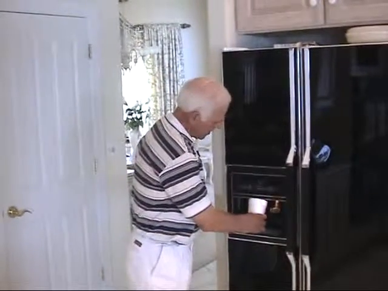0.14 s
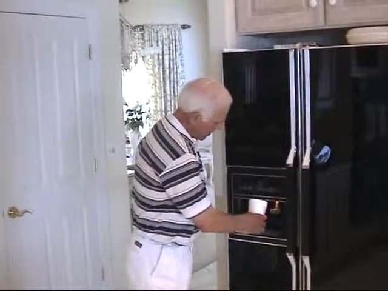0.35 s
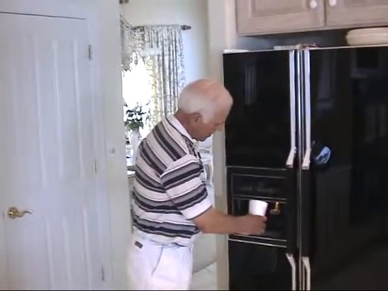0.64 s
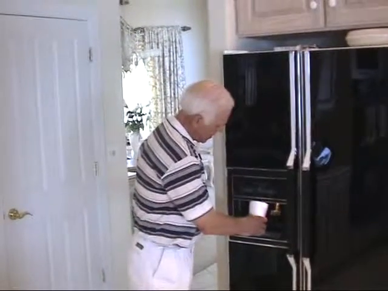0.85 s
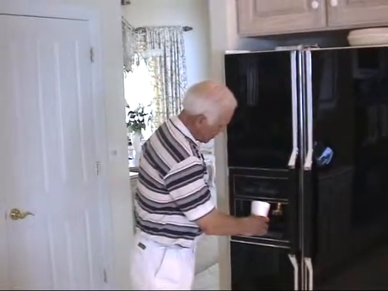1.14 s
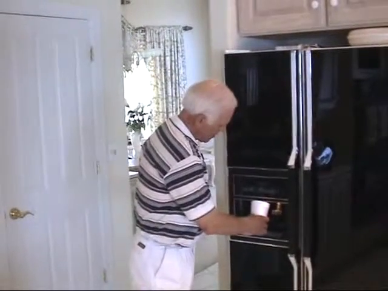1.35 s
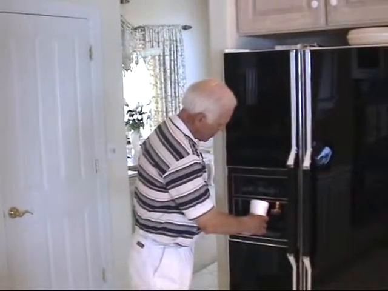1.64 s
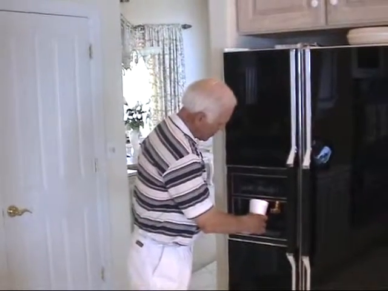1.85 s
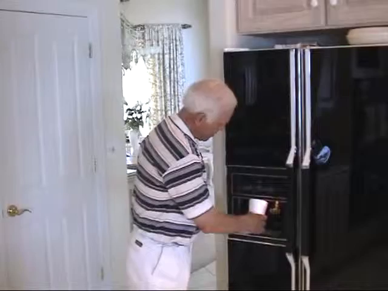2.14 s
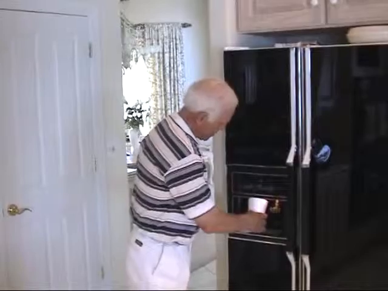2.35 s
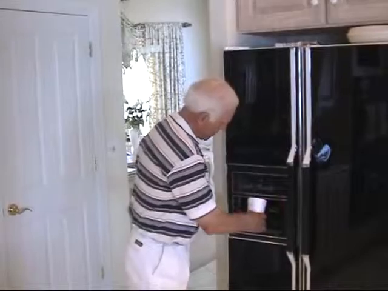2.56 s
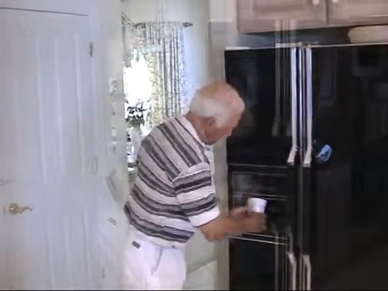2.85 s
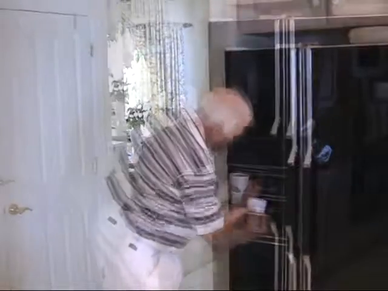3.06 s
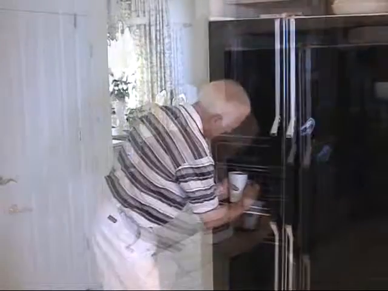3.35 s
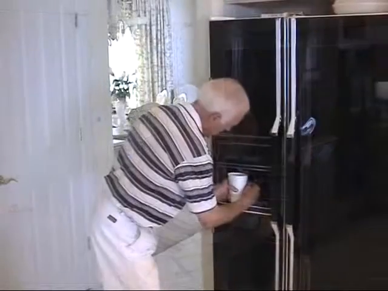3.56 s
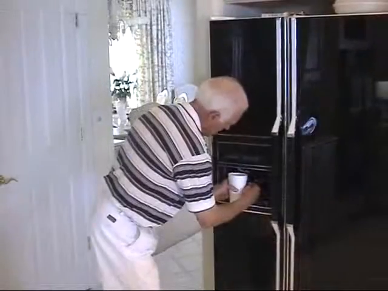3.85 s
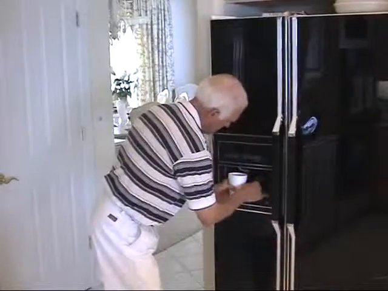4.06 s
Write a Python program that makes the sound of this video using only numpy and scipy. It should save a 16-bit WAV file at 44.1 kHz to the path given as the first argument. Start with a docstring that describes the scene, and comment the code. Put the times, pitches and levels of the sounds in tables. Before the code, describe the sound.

Crushed ice tumbles from a refrigerator door dispenser into a foam cup in a dense, crackling clatter, then thins out and ends with small knocks.

```python
"""Crushed ice tumbles from a refrigerator door chute into a foam cup, heard some metres off in a kitchen.
First the fading echo of earlier clatter, then the pour: lumps land as bursts of contacts that ring the cup's modes.
As the cup fills, the crack of chips gains top treble; from 2.75 s it is drawn back and tipped, and rings differently.
The ice settles and thins out; past 4 s the cup knocks the dispenser twice: decaying sines and a rattle.
Throughout: faint hiss (shaped noise) and the kitchen's echo (decaying noise tails)."""
import sys
import numpy as np
from scipy import signal
from scipy.fft import rfft, irfft, next_fast_len
from scipy.io import wavfile
from scipy.ndimage import uniform_filter1d, map_coordinates

SR = 44100
rng = np.random.default_rng(int(sys.argv[2]) if len(sys.argv) > 2 else 0)


def bounce(signal):
    """Save signal as a 16-bit WAV file at the path given by the first command-line argument."""
    frames = np.transpose(np.atleast_2d(signal))
    limited = np.clip(frames, -1, 1)
    pcm = np.round(limited * 32767).astype(np.int16)
    wavfile.write(sys.argv[1], SR, pcm)


N = 185616
T = np.arange(N) / SR


def amp(db):
    """dB to gain."""
    return 10 ** (np.asarray(db) / 20)


def unit(x):
    """x at rms 1."""
    return x / np.sqrt(np.mean(x ** 2) + 1e-20)


def along(points, hz):
    """(f/Hz, value) points interpolated on a log frequency axis."""
    f, v = np.transpose(points)
    return np.interp(np.log(hz + 1), np.log(f + 1), v)


def wobble(knots_per_s):
    """A smooth random curve through normal random knots."""
    return map_coordinates(rng.standard_normal(int(N * knots_per_s / SR) + 4), [T * knots_per_s])


def filtered(x, response):
    """x times a complex response of frequency."""
    m = 2 * next_fast_len(N // 2 + SR // 8)
    return irfft(rfft(x, m) * response(np.fft.rfftfreq(m, 1 / SR)), m)[..., :N]


def causal(points):
    """The minimum-phase response with the gain of the points, by folding the cepstrum."""
    def response(hz):
        cep = irfft(np.log(amp(along(points, hz)) + 1e-6))
        cep[1:len(hz)] *= 2
        cep[len(hz):] = 0
        return np.exp(rfft(cep))
    return response


def decaying(impulses, life_s):
    """Each impulse dies exponentially, to 1/e in life_s."""
    return signal.lfilter([1], [1, -np.exp(-1 / (life_s * SR))], impulses)


REBOUND_HZ = 280


def without_thump(x):
    """Low end rolled off below REBOUND_HZ: no deep thump, no bass stirred in the room."""
    return signal.lfilter(*signal.butter(2, REBOUND_HZ, 'high', fs=SR), x)


# hiss colour before the low cut: f/Hz, relative level/dB
HISS_COLOUR = [(500, 10), (16000, -6)]


def hiss():
    """Steady background noise, its low end rolled off below 900 Hz."""
    noise = rng.standard_normal(N)
    return amp(-72.5) * unit(filtered(noise, lambda hz: amp(along(HISS_COLOUR, hz)) * hz / (hz + 900)))


# decay of the room: f/Hz, t60/s
KITCHEN_DECAY = [(300, 0.64), (5000, 0.15), (12000, 0.28)]
EARLY_T60_S = 0.047


def kitchen(x, early_db, late_db):
    """The recess answers at once, the room dies more slowly; each stretch of sound finds its own paths."""
    out, step = np.pad(x, (0, SR)), SR // 12
    lag = np.arange(SR // 2) / SR
    for i in range(0, N, step):
        hz, t, z = signal.stft(rng.standard_normal(SR // 2), SR, nperseg=256)
        decay = amp(-60 * t / along(KITCHEN_DECAY, hz)[:, None])
        late = signal.istft(z * decay, SR, nperseg=256)[1][:len(lag)]
        early = rng.standard_normal(len(lag)) * amp(-60 * lag / EARLY_T60_S)
        tail = amp(late_db) * np.roll(late, 400) / np.linalg.norm(late)  # 9 ms later
        tail += amp(early_db) * early / np.linalg.norm(early)
        echo = signal.fftconvolve(x[i:i + step], without_thump(tail))
        out[i:i + len(echo)] += echo
    return out[:N]


# cup against dispenser: t/s, level/dB, brightness/(dB per octave re 1 kHz), contact/s
DISPENSER_KNOCKS = [(4.058, -27.5, -33.5, 0.00094), (4.0761, -29, 4.5, 0.00015)]
# what then rings: f/Hz, level/dB, t60/s
CRADLE_MODES = [(735, -12, .028), (1154, -9, .14), (1600, -7, .018), (2266, 0, .022), (4900, -8, .009)]


def knocks():
    """After the pour the cup knocks the dispenser: a soft knock stirs the low modes, a hard one all."""
    out, t = np.zeros(N + SR), np.arange(SR // 4) / SR
    for s, db, bright_db, contact_s in DISPENSER_KNOCKS:
        ring = np.zeros(len(t))
        for hz, level_db, t60_s in CRADLE_MODES:
            mode_db = level_db + bright_db * np.log2(hz / 1000)
            ring += amp(mode_db - 60 * t / t60_s) * np.sin(2 * np.pi * hz * t)
        out[round(s * SR):][:len(t)] += amp(db) * ring * (1 - np.exp(-(t / contact_s) ** 2))
    return out[:N]


# fine clatter as it swells and fades, opening with the echo of earlier clatter: t/s, level/dB
CLATTER_LEVEL = [(0, -44), (.21, -53.5), (.235, -58), (.25, -44.5), (.7, -39), (.95, -38.5), (1.27, -43),
                 (1.72, -44), (2.22, -43.5), (2.33, -43), (2.55, -40.5), (3.02, -35.5), (3.19, -42.5),
                 (3.3, -39), (3.56, -37), (3.8, -58), (4.05, -102), (4.21, -55)]
# bursts of fine clatter that thin out: showers of chips, and at 4.08 s the rattle after the knock:
# t/s, level/dB
CLATTER_BURSTS = [(0.751, -29), (1.299, -36.5), (2.048, -39), (2.24, -26.5), (2.578, -29), (4.08, -55)]
BURST_RISE_S, THINS_DB_PER_S = 0.0054, 89.5


def patter_db():
    """Level of the fine clatter: a swelling and fading curve plus bursts that rise fast and thin out."""
    power = amp(np.interp(T, *np.transpose(CLATTER_LEVEL))) ** 2
    for s, db in CLATTER_BURSTS:
        since = np.clip(T - s, -1, None)
        rise = np.exp(-(np.minimum(since, 0) / BURST_RISE_S) ** 2)
        power = power + amp(db - THINS_DB_PER_S * np.maximum(since, 0)) ** 2 * rise
    return 10 * np.log10(power)


POUR_STARTS_S = .24
# fainter patter than the median: more crack, less knock
CRACK_DB_PER_DB, KNOCK_DB_PER_DB = -0.0749, 0.0548
# chips that stand out as ticks: level over the patter, its scatter, life
TICKS_PER_S, TICK_DB, TICK_SCATTER_DB, TICK_S = 70, 8.5, 7, 0.00096


def patter_power(patter):
    """Power of the fine clatter as thud, knock and crack; in the pour it flickers and chips tick."""
    pouring = T > POUR_STARTS_S
    flicker_db = 2.5 * wobble(60) * pouring
    power = amp(patter + flicker_db + np.array([[-3], [-3], [-16]])) ** 2
    over_median = patter - np.median(patter)
    power[1] *= amp(KNOCK_DB_PER_DB * over_median) ** 2
    power[2] *= amp(CRACK_DB_PER_DB * over_median) ** 2
    hit = rng.random(N) < TICKS_PER_S / SR * pouring
    ticks = decaying(hit * amp(TICK_DB + TICK_SCATTER_DB * rng.standard_normal(N)) ** 2, TICK_S)
    power[1:] *= 1 + ticks * [[.3], [1]]
    return power


# larger lumps: peak t/s, level/dB, crack re level/dB, rise/s (limited in the blow), ring f/Hz
BIG_LUMPS = [(0.148, -45, -19, .001, 2602), (.24, -32, -15, 0.0011, 2360), (0.251, -32.5, -9, 0.0039, 2430),
             (0.291, -27, -15, 0.0091, 1310), (0.334, -33.5, -15, 0.0023, 1140),
             (0.35, -32, -11.5, 0.0091, 900), (0.377, -45, -6, 0.0013, 2472),
             (.388, -28, -16.5, 0.0043, 2530), (0.425, -30, -6, 0.0023, 980),
             (0.443, -25.5, -13, 0.0085, 2820), (0.538, -31.5, -13, 0.0029, 898),
             (0.588, -36, -11.5, 0.0074, 2458), (.617, -45.5, 15, 0.0015, 1090),
             (0.667, -30, -0.5, 0.003, 2850), (0.69, -39.5, -22, 0.0031, 1143),
             (0.718, -47, 10.5, 0.0055, 1170), (.741, -24, -8.5, 0.0024, 990),
             (0.761, -24, -11, 0.0048, 1040), (0.781, -24.5, -1, 0.0021, 1188),
             (0.804, -31, -4, 0.0043, 3050), (0.849, -23, -2, 0.0031, 1115),
             (0.904, -30.5, -11, 0.0063, 980), (0.936, -25.5, -16, 0.0069, 1254),
             (.962, -31.5, -4.5, 0.0028, 760), (.981, -26.5, -10.5, 0.0015, 1300),
             (1.017, -19, -9, 0.00093, 648), (1.067, -41, 3.5, 0.0018, 1260),
             (1.091, -33, -4.5, 0.0095, 2475), (1.126, -28, -8.5, 0.0022, 2810),
             (1.168, -21.5, -8, 0.0029, 2540), (1.221, -36.5, -2, 0.015, 2500),
             (1.235, -25.5, -17, 0.0018, 2520), (1.291, -20.5, -17.5, 0.0016, 2463),
             (1.31, -30.5, -10.5, 0.008, 1140), (1.359, -27.5, -11.5, 0.0018, 1255),
             (1.441, -34.5, -8.5, 0.015, 2625), (1.481, -36.5, -12, 0.0021, 1264),
             (1.495, -31.5, -9, 0.003, 1230), (1.537, -27.5, -35, 0.00091, 1197),
             (1.579, -30, -6, 0.002, 2700), (1.603, -34.5, -10, 0.0086, 2660),
             (1.66, -39, -26, 0.0015, 1190), (1.7312, -27.5, 4.5, 0.0011, 2720),
             (1.737, -22, -8.5, 0.0031, 2400), (1.783, -32.5, -24, 0.0025, 2540),
             (1.813, -32, -14, 0.0094, 1232), (1.846, -29, -18, 0.0077, 2550),
             (1.88, -26.5, -15.5, 0.026, 1380), (1.975, -25, -16, 0.002, 2570),
             (1.982, -28, -13, 0.0041, 2720), (2.031, -25.5, -13, .0012, 2650),
             (2.0369, -19, -7, 0.0017, 2030), (2.047, -20.5, -18, .005, 1200),
             (2.125, -22.5, -9.5, 0.00152, 1164), (2.178, -31.5, -19, 0.0029, 1382),
             (2.2355, -18, -6.5, 0.0014, 1195), (2.244, -23.5, -4.5, 0.0019, 2408),
             (2.249, -18, -17, 0.0023, 3160), (2.27, -27, -13.5, 0.013, 2550),
             (2.306, -24, -12, 0.0022, 2510), (2.362, -25, -13, 0.0024, 1310),
             (2.379, -27.5, -10, 0.0026, 1204), (2.399, -34, -2.5, 0.0047, 2480),
             (2.442, -24, -10, 0.0069, 2300), (2.481, -32, 7.5, 0.0019, 1176),
             (2.492, -23.5, -14, 0.0094, 1164), (2.52, -29, -4, 0.0021, 1230),
             (2.561, -28, 0.5, 0.0026, 1180), (2.571, -19.5, -12, 0.0045, 1200),
             (2.59, -23, -11, 0.013, 1265), (2.647, -28.5, 0, 0.0016, 1090),
             (2.694, -27.5, -6, 0.024, 2000), (2.781, -28.5, -2, 0.0018, 1500),
             (2.789, -21.5, -8, 0.0071, 1030), (2.842, -28, -8, 0.014, 825),
             (2.877, -35, 0.5, 0.0059, 1490), (2.908, -27.5, -4, .0012, 1610),
             (2.922, -23.5, -7.5, 0.0081, 1640), (2.995, -25, 3, 0.00073, 2100),
             (3.011, -21, -7.5, 0.0064, 1446), (3.044, -24, -22, 0.0016, 1554),
             (3.052, -26.5, 6, 0.00048, 2005), (3.074, -26, -7, 0.0024, 1710),
             (3.133, -30.5, -13, 0.0023, 1152), (3.154, -40, -9, 0.0011, 1050),
             (3.1982, -23, -1, 0.00082, 1150), (3.201, -18.5, -15, 0.001, 2500),
             (3.24, -43.5, 5, 0.0051, 1150), (3.268, -28, -5, 0.0039, 1070), (3.296, -40, -3, 0.0019, 1160),
             (3.34, -28.5, -17.5, 0.012, 2100), (3.367, -29, -11, 0.0095, 904),
             (3.397, -32, -8, 0.0036, 1640), (3.426, -44, -4, 0.0012, 1330),
             (3.446, -27, -9, 0.0077, 959.6), (3.49, -32.5, -7, 0.0032, 1570),
             (3.517, -29, -10, 0.003, 1514), (3.527, -28.5, -18, .005, 1540),
             (3.54, -19.5, -13.5, 0.0071, 1550), (3.626, -36, -5.5, 0.0016, 1100),
             (3.657, -35.5, -17.5, 0.0084, 1430), (3.759, -42.5, -11.5, 0.0021, 1510),
             (3.823, -39.5, -5.5, 0.0019, 2430), (3.833, -42.5, -8, 0.0023, 2420),
             (3.862, -42, -1, 0.0011, 1910), (3.882, -38.5, -11, 0.00195, 1080),
             (3.894, -36, -18, 0.00267, 1590), (3.938, -40.5, -5, 0.0023, 940),
             (3.971, -50, -20, 0.0019, 2480), (4.061, -29.5, -11, 0.00156, 697),
             (4.078, -28.5, -4.5, 0.001, 1152), (4.1723, -56.5, 16, 0.0005, 1224),
             (4.181, -54, 13.5, 0.00078, 1120)]
# small lumps: level over the patter, its scatter, crack re level, typical rise
SMALL_PER_S, SMALL_DB, SMALL_SCATTER_DB, SMALL_CRACK_DB, SMALL_RISE_S = 30, 5.5, 1, -12, .003
CLEARANCE_S, SMALL_LOWEST_HZ = .018, 800


def lumps(patter):
    """The larger lumps and, by chance in the gaps, small ones; in order of time."""
    big, count = np.array(BIG_LUMPS), int(SMALL_PER_S * N / SR)
    when, mode = rng.random((count, 2)).T
    size, crack, crumble = rng.standard_normal((count, 3)).T
    s = (np.arange(count) + when) / SMALL_PER_S
    level_db = np.interp(s, T, patter) + SMALL_DB + SMALL_SCATTER_DB * size
    rise_s = SMALL_RISE_S * np.exp(.5 * crumble)
    small = np.c_[s, level_db, SMALL_CRACK_DB + 4 * crack, rise_s, SMALL_LOWEST_HZ * 4 ** mode]
    clear = np.abs(s[:, None] - big[:, 0]).min(axis=1) > CLEARANCE_S
    rows = np.r_[big, small[clear & (s > POUR_STARTS_S)]]
    return rows[np.argsort(rows[:, 0])]


RING_DB, RING_CYCLES = -13, 60  # level over the lump's, t60 in cycles


def rings():
    """The cleaner the blow of a larger lump, the more one tone of the cup stands out after it."""
    out, t = np.zeros(N + SR), np.arange(SR // 8) / SR
    for s, db, _, rise, ring_hz in BIG_LUMPS:
        clean_db = RING_DB - 9 * (rise / 0.0024) ** 2
        tone = amp(db + clean_db - 60 * t * ring_hz / RING_CYCLES) * np.sin(2 * np.pi * ring_hz * t)
        out[round((s - min(rise, .012)) * SR):][:len(t)] += tone
    return out[:N]


EVENS_OUT_S = .004


def contacts(per_s, scatter_db):
    """Random sharp contacts of uneven size whose strength evens out over a few ms, rms 1."""
    hit = rng.random(N) < per_s / SR
    x = unit(hit * rng.choice([-1, 1], N) * amp(scatter_db * rng.standard_normal(N)))
    local_power = np.abs(uniform_filter1d(x ** 2, size=round(EVENS_OUT_S * SR)))
    return unit(x / np.sqrt(.1 + local_power))


PIECES_PER_S, PIECES_SHARE, PIECE_S = 260, 0.37, 0.0019  # rate, share of lump energy, life


def crumbling():
    """A crumbling lump breaks up into separate hard hits: a power curve of mean 1."""
    pieces = decaying((rng.random(N) < PIECES_PER_S / SR) * rng.random(N), PIECE_S)
    return 1 + PIECES_SHARE * (pieces / pieces.mean() - 1)


# a lump that rings low thuds more than it knocks: ring of an even split, slope
EVEN_HZ, SPLIT_DB_PER_OCTAVE = 833, 1.5


def blows(patter, fallen):
    """Force on the cup as thud, knock and crack: each lump builds up, peaks and stops short."""
    power = patter_power(patter)
    pieces = crumbling()
    snaps = np.zeros((3, N))
    t = np.arange(-SR // 25, SR // 12) / SR
    for s, db, crack_db, rise, ring_hz in fallen:
        rise = np.clip(rise, .0003, .012)
        knock = 1 / (1 + amp(-SPLIT_DB_PER_OCTAVE * np.log2(ring_hz / EVEN_HZ)) ** 2)
        size = amp(db) * np.array([[np.sqrt(1 - knock)], [np.sqrt(knock)], [amp(crack_db)]])
        build_up = np.exp(-np.abs(t / rise) ** 1.66)
        stop = np.exp(-np.abs(t / (0.0017 + 0.65 * rise)) ** 1.15)
        burst = np.where(t < 0, build_up, stop)
        # the shorter the build-up, the more of the energy arrives as one clean blow
        clean = 0.7 * np.exp(-(rise / 0.0019) ** 2)
        i = round(s * SR) - SR // 25
        broken = burst[:N - i] * pieces[i:i + len(t)]
        power[:, i:i + len(t)] += (1 - clean) * size ** 2 * broken * burst.sum() / broken.sum()
        snaps[:, round((s - rise) * SR)] += size[:, 0] * np.sqrt(clean * burst.sum())
    snaps = without_thump(snaps)
    # crack: partly the shared contacts, partly chips shattering on their own
    shared = contacts(4000, scatter_db=3.5)
    splinters = unit(1.37 * shared + contacts(8800, scatter_db=1.0))
    return np.sqrt(power) * [shared, shared, splinters] + snaps * [[1], [1], [.3]]


def facets(x, depth_db):
    """Every chip has its own shape, so the colour of the clatter shifts from moment to moment."""
    z = signal.stft(x, nperseg=128)[2]
    field = uniform_filter1d(rng.standard_normal(z.shape[1:]), size=3, axis=0)
    field = uniform_filter1d(field, size=6, axis=1)
    field[:2] = 0  # the bass comes from the whole cup and keeps its colour
    return signal.istft(z * amp(depth_db * unit(field)), nperseg=128)[1][:, :N]


EDGES_HZ = (1450, 3700)  # thud | knock | crack
# foam wall and microphone, relative within each part: f/Hz, gain/dB
WALL_GAIN = [(25, -31), (150, -23.5), (345, -6.5), (427, -19), (503, -4), (800, 0.5), (1740, 1.5),
             (2900, -1.5), (3750, -6), (5570, -7), (7600, -14), (12000, -30), (16000, -41)]


def through_wall(parts):
    """Each part is kept to its band and coloured by the foam wall and microphone."""
    def response(hz):
        low = 1 / (1 + (hz / EDGES_HZ[0]) ** 8)
        high = 1 / (1 + (EDGES_HZ[1] / (hz + 1)) ** 8)
        return np.array([low, 1 - low - high, high]) * causal(WALL_GAIN)(hz)
    return filtered(parts, response)


# cup and chute resonances: f/Hz, width/Hz (floored), level under the chute/dB, level in the hand/dB
CUP_MODES = [(641.6, 114, 0.5, -10), (920, 81, 3.5, 4), (1054, 42, 5.5, 0), (1140.4, 43, 10.5, 2),
             (1230, 71, 9, 5.5), (1480, 138, 8.5, 15), (1618, 15, 7, 4.5), (1982, 270, 4, 9.5),
             (2254, 47, 1.5, -15), (2423.6, 250, 10.5, 3.5), (2688, 104, 14, -25), (3050, 280, 13, -14),
             (4570, 460, 4.5, -49), (5530, 670, -44, 1)]
NARROWEST_HZ = 45
DRAWN_BACK_S = (2.75, 2.9)
# as ice fills the cup, chips meet ice instead of foam: extra top treble
OPEN_S, OPEN_DB = (2.4, 3.1), -8
AIM_FADES_S = 0.019  # after a lump the chips strike anywhere again
SHIFTS_DB = 2  # the heap shifts and damps now one mode, now another


def cup(forces, fallen):
    """The wall passes each blow broadly; the spot where a lump lands decides which modes ring most."""
    s, rise, ring_hz = fallen[:, [0, 3, 4]].T
    lump = np.clip(np.searchsorted(s - 2 * rise, T) - 1, 0, None)  # the latest at each sample
    aim_db = 11 + 9 * np.exp(-(rise / 0.002) ** 2)  # a clean blow singles out its mode more
    luck = rng.standard_normal((len(s), len(CUP_MODES)))
    fresh = np.exp(-np.clip(T - s[lump], 0, None) / AIM_FADES_S)
    held = np.interp(T, DRAWN_BACK_S, [0, 1])
    wall = facets(forces, depth_db=3.0)
    for k, (hz, width, chute_db, hand_db) in enumerate(CUP_MODES):
        spot_db = aim_db * np.exp(-(np.log(hz / ring_hz) / 0.02) ** 2) + 1.94 * luck[:, k]
        spot_db = spot_db[lump] * fresh + SHIFTS_DB * wobble(17)
        part = np.searchsorted(EDGES_HZ, hz)
        b, a = signal.iirpeak(hz, hz / max(width, NARROWEST_HZ), SR)
        strike = amp(chute_db + held * (hand_db - chute_db) + spot_db)
        wall[part] += signal.lfilter(b, a, strike * forces[part])
    top_treble = np.diff(forces[2], n=2, prepend=[0, 0])
    wall[2] += amp(OPEN_DB) * np.interp(T, OPEN_S, [0, 1]) * top_treble
    wall = through_wall(wall)
    # each part keeps the energy that it was struck with
    kept = np.std(forces, axis=1, keepdims=True) / np.std(wall, axis=1, keepdims=True)
    return np.sum(wall * kept, axis=0)


def scene():
    """Ice in the cup, heard through the kitchen over a faint hiss."""
    patter = patter_db()
    fallen = lumps(patter)
    tones = without_thump(rings() + knocks())
    ice = cup(blows(patter, fallen), fallen) + tones
    return (kitchen(ice, early_db=-13.5, late_db=-12.0) * amp(-4.5) + hiss())[None]


TOP_HZ = 15850


def record(dry):
    """The input stage rounds off the loudest peaks towards 0.3; nothing is kept above TOP_HZ."""
    rounded = dry / (1 + np.abs(dry / .3) ** 4) ** (1 / 4)
    return filtered(rounded, lambda hz: hz < TOP_HZ)


dry = scene()
out = record(dry)
bounce(out)
```